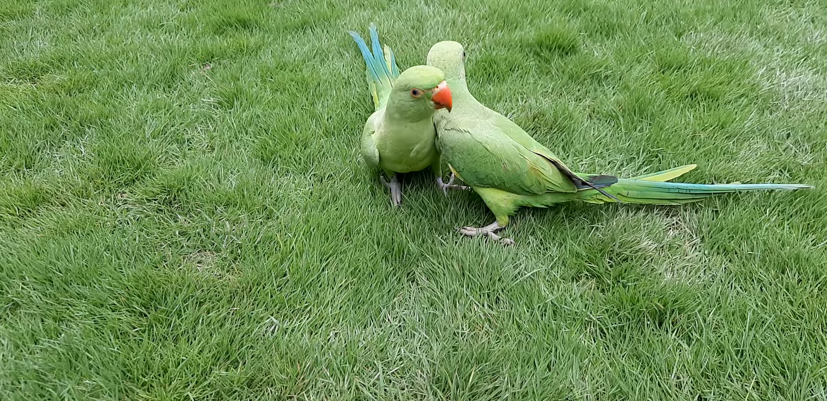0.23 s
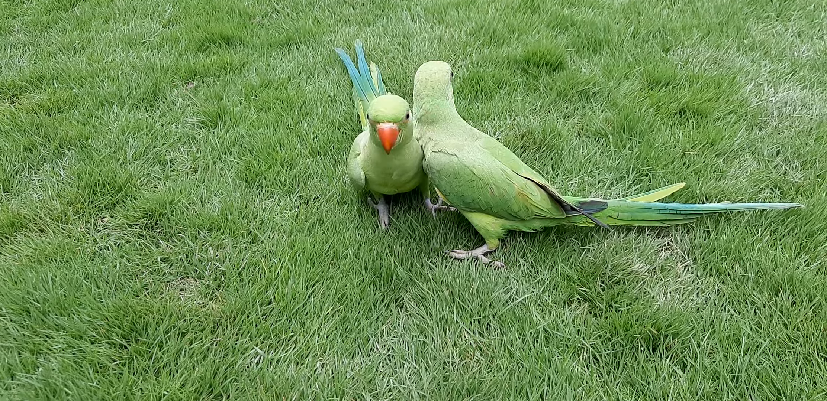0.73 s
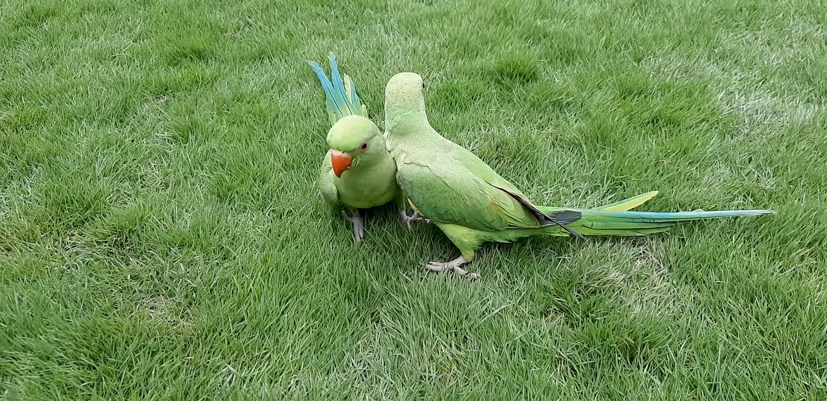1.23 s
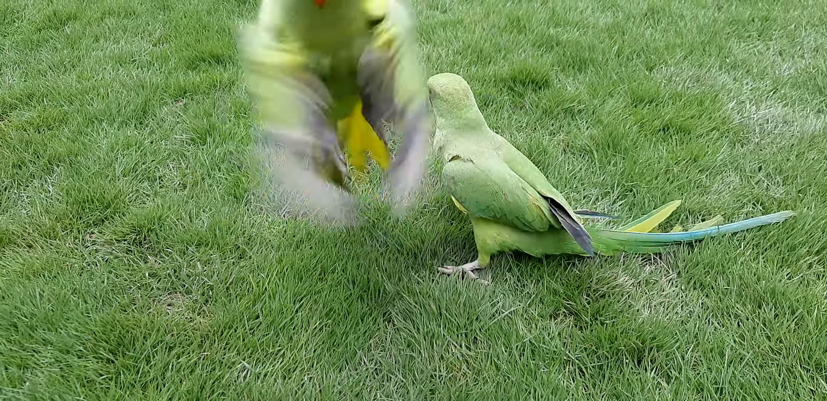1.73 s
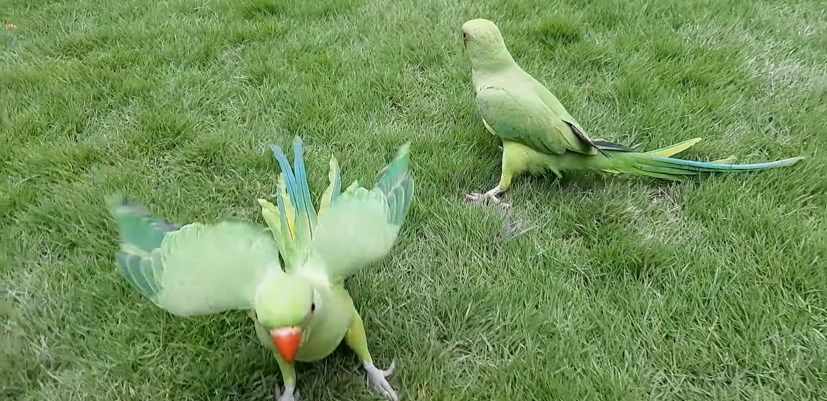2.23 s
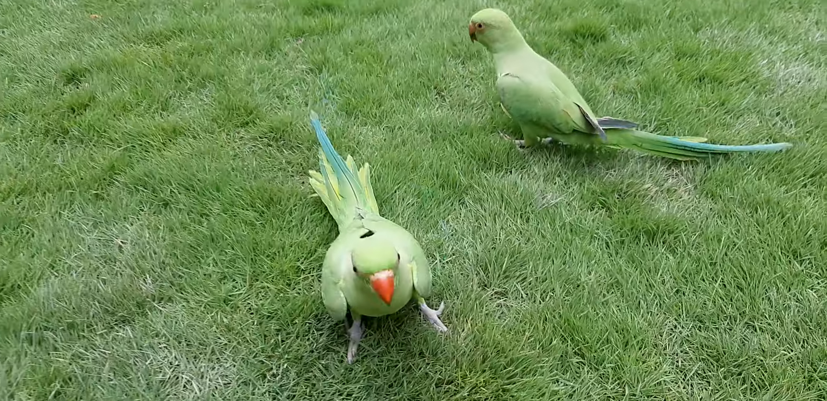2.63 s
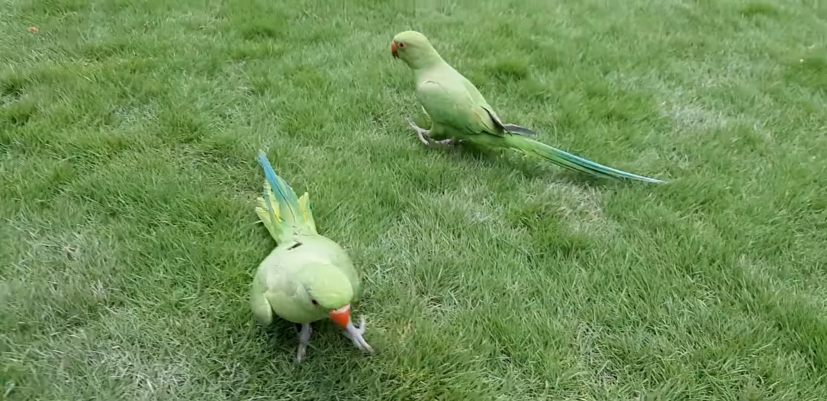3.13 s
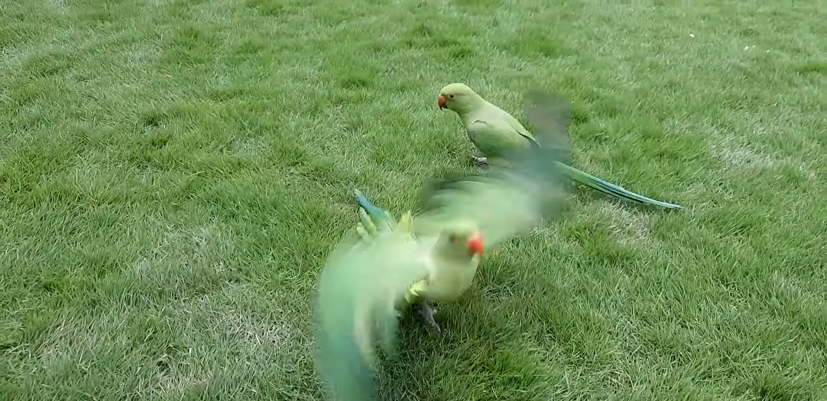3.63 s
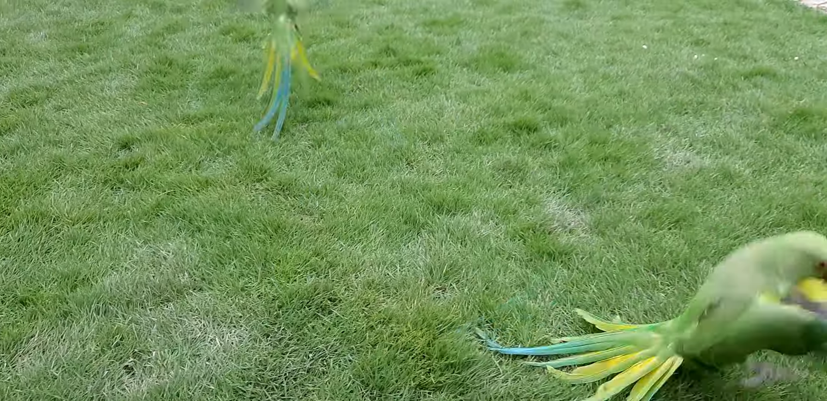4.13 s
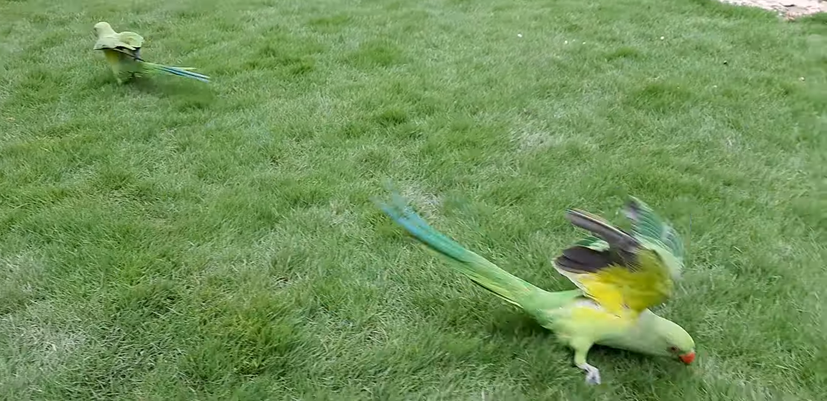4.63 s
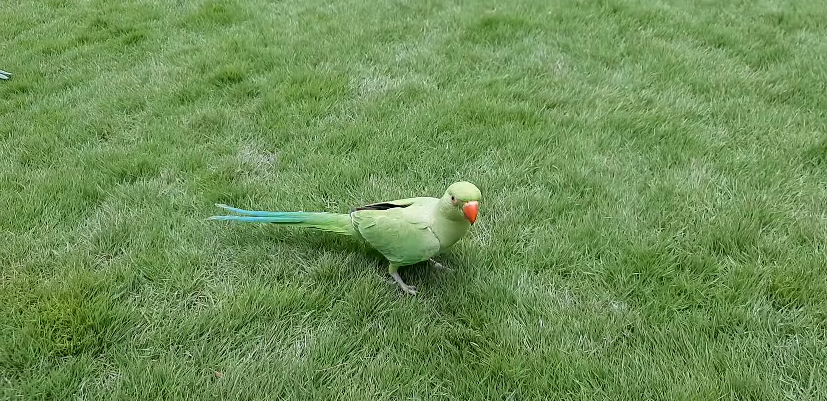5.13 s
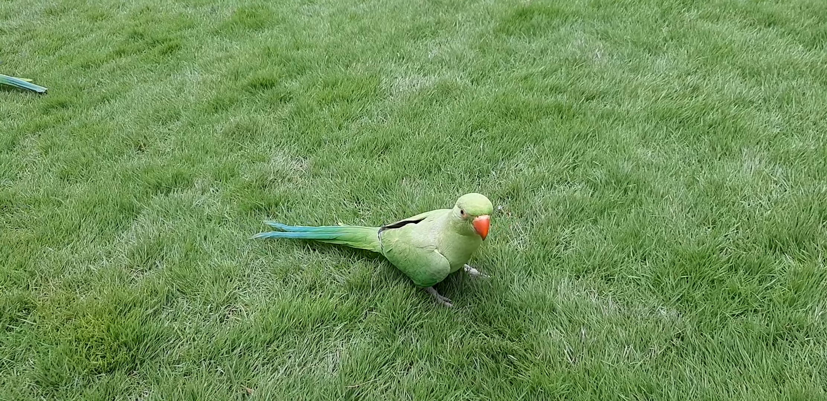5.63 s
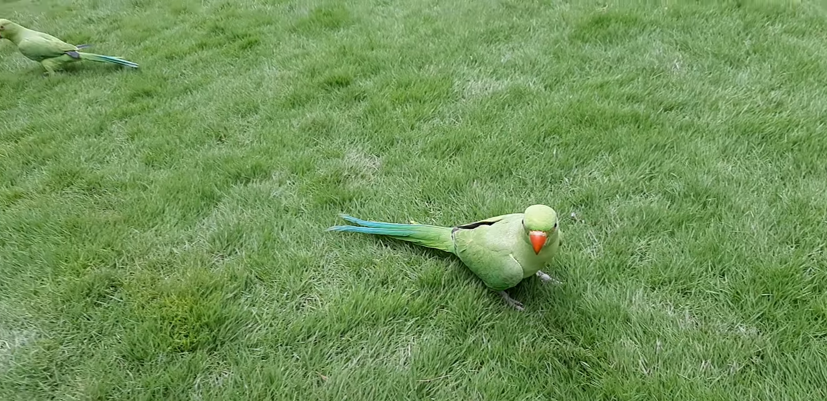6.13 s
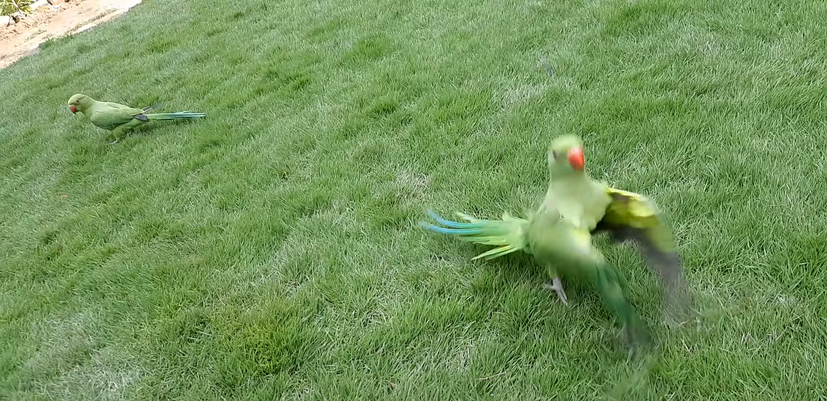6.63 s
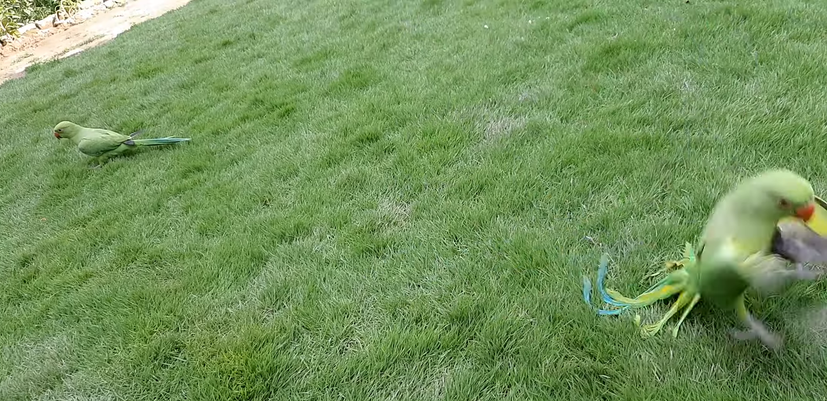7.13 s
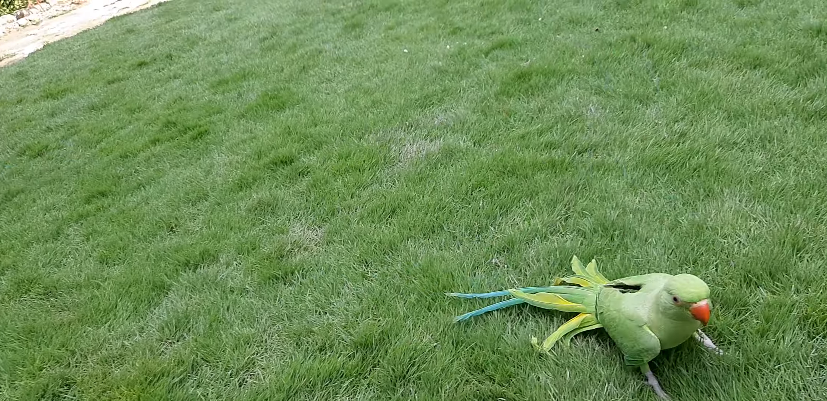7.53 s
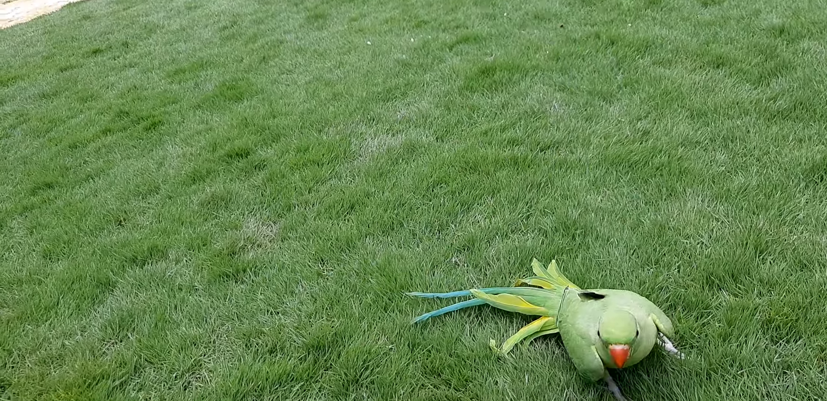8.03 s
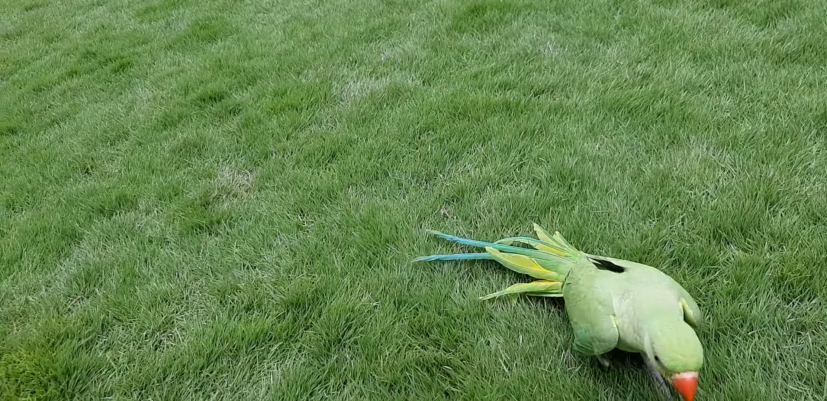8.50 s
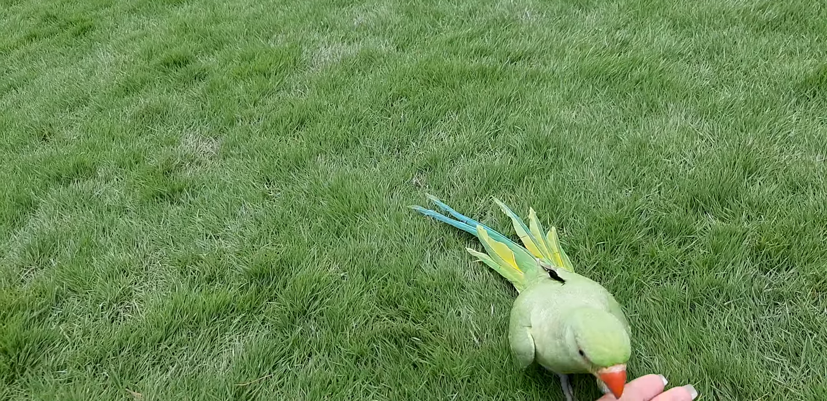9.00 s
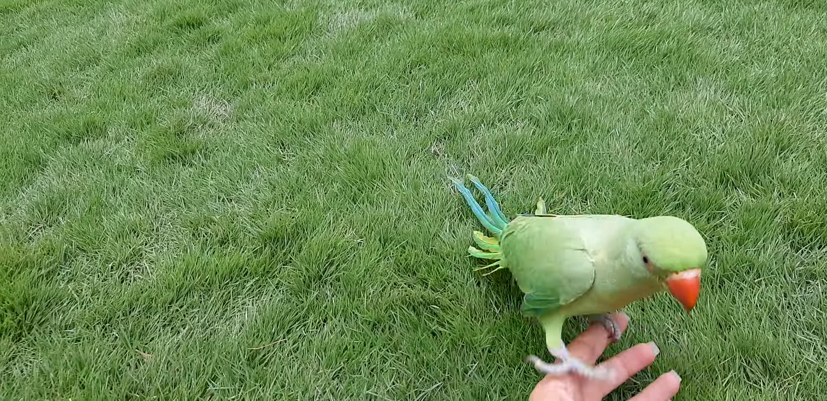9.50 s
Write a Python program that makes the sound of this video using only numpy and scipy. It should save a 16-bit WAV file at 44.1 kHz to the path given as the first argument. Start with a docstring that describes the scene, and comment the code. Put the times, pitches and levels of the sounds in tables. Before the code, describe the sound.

Steady machine hum and airy whir on a lawn, three short bursts of fluttering parakeet wings, and two shrill squawks before the last flight.

```python
"""Parakeets on a lawn beside a humming machine

Two parakeets are close to a handheld stereo microphone, and a machine hums and whirs off to the right.
In three short flights, bursts of noise clap about twelve times a second and filtered noise blows as wind.
Between the last two flights come two shrill calls, built from sine partials and noise: a rasp,
a whistled arch, then a jump up into a rough falling note. Wavering tones and noise make the machine,
and faint whistles sound far away."""
import sys
import numpy as np
from scipy import signal
from scipy.fft import rfft, irfft
from scipy.io import wavfile
from scipy.ndimage import uniform_filter1d

SR = 44100
rng = np.random.default_rng(int(sys.argv[2]) if len(sys.argv) > 2 else 0)


def materialize(psi):
    """Save the field psi as 16-bit PCM at rate SR to the path in sys.argv[1].

    A 1-D psi becomes a single channel; in a 2-D psi each row is a channel.
    """
    bounded = np.clip(np.atleast_2d(psi).T, -1, 1)
    quanta = np.round(bounded * 32767).astype(np.int16)
    wavfile.write(sys.argv[1], SR, quanta)


N = 430416
TIME = np.arange(N) / SR
FREQ = np.fft.rfftfreq(N, 1 / SR)
TOP_HZ = 16000  # highest pitch that is kept


def undb(db):
    """Decibels to gain."""
    return 10 ** (np.asarray(db) / 20)


def unit(x):
    """Scale to rms 1."""
    return x / np.sqrt(np.mean(x ** 2))


def progress(start, end):
    """Runs from 0 to 1 between two times."""
    return np.clip((TIME - start) / (end - start), 0, 1)


def step(u, at, width):
    """A soft step from 0 to 1."""
    return (1 + np.tanh((u - at) / width)) / 2


def curves(table):
    """The columns of a table, joined by straight lines in time."""
    s, *columns = np.transpose(table)
    return [np.interp(TIME, s, c) for c in columns]


def spectrum(table, hz=FREQ, order=1):
    """One column of a table, joined by straight lines on a log-frequency axis."""
    rows = np.transpose(table)
    return np.interp(np.log(hz + 1e-3), np.log(rows[0]), rows[order])


def colour(x, db):
    """Filter by a gain in dB for every frequency."""
    return irfft(rfft(x) * undb(db), N)


def noise():
    """White noise."""
    return rng.standard_normal(N)


def walk(rate):
    """Smooth random wandering with spread 1; a higher rate in Hz wanders faster."""
    return unit(irfft(rfft(noise()) * np.exp(-(FREQ / rate) ** 2), N))


def place(x, pan_db, lag):
    """A source at the two ports: left minus right level in dB, and the left one later by lag samples."""
    left = np.roll(x, int(lag)) * undb(pan_db / 2)
    right = x * undb(-pan_db / 2)
    return np.array([left, right])


def add(out, s, sound):
    """Mix a short stereo sound in at time s."""
    i = int(s * SR)
    out[:, i:i + sound.shape[1]] += sound[:, :N - i]


def blips(table, waver):
    """Short sine notes that swell and fade, with a shared waver in pitch."""
    turns = 2 * np.pi * np.cumsum(1 + waver * walk(52.5)) / SR
    out = 0
    for s, hz, db, half_length in table:
        swell = np.exp(-((TIME - s) / half_length) ** 2)
        out = out + undb(db) * swell * np.sin(hz * turns)
    return out


def snap(table, length, grain_db=4):
    """A burst of uneven slaps, a few milliseconds long, ringing with the given spectrum."""
    size = 2048
    t = TIME[:size]
    length = max(length, .001)  # never shorter than 1 ms
    grain = uniform_filter1d(rng.standard_normal(size), size=9) * 2.16
    slaps = rng.standard_normal(size) * undb(grain_db * grain)
    attack = 1 - np.exp(-t / 0.00044)
    decay = np.exp(-(t / length) ** 2 * 2) + 0.055 * np.exp(-t / length / 2)
    slaps *= attack * decay
    # fold the cepstrum so that the ringing only follows the slaps
    cepstrum = irfft(np.log(undb(spectrum(table, np.fft.rfftfreq(size, 1 / SR)))))
    cepstrum[1:size // 2] *= 2
    cepstrum[size // 2 + 1:] = 0
    sound = irfft(rfft(slaps) * np.exp(rfft(cepstrum)))
    return sound / np.sqrt(np.sum(sound ** 2) / (length * SR)) / 5  # peak near 1


# The flights. Each row: first clap in seconds, time between wingbeats in seconds, left minus right in dB,
# level of the air thump in dB, and a list with the peak of each clap in dB.
FLIGHT_ROWS = [(1.719, 0.078, -9, -19, [-13.5, -9.5, -11, -16, -14.5]),
               (3.812, .08, -8, -19.5, [-10, -8, -5, -10.5, -6, -19]),
               (6.791, .0817, -8.5, -25.5, [-8.5, -14, -10, -5, -14, -19.5])]
# Tone colour of stiff feathers slapping. Each row: pitch in Hz, relative level in dB.
FEATHER_COLOUR = [(300, -19), (1500, -11), (2800, -3), (4200, -1.5), (6000, -1), (7500, 0), (9000, -9),
                  (12000, -8.5), (16000, -14)]
# Tone colour of the air squeezed from between the wings. Each row: pitch in Hz, relative level in dB.
THUMP_COLOUR = [(60, -46), (250, -14), (600, 6), (1200, 2), (2200, -2.5), (5000, -24)]
CLAP_S, THUMP_FOLLOWS = 0.0054, 0.55  # length of a clap; dB of thump per dB of clap
RUSTLE_DB, RUSTLE_LEAD_S, RUSTLE_S = -20.5, .004, .016  # level against the clap, head start, length


def claps():
    """Feathers slap and brush together on each steady beat and squeeze out a thump of air."""
    out = np.zeros((2, N))
    for first, beat, pan_db, air_db, strengths in FLIGHT_ROWS:
        for k, db in enumerate(strengths):
            s = first + k * beat
            effort_db = db - np.mean(strengths)
            clap = place(snap(FEATHER_COLOUR, CLAP_S), pan_db, lag=8)
            rustle = place(snap(FEATHER_COLOUR, RUSTLE_S), pan_db, lag=8.8)
            thump = place(snap(THUMP_COLOUR, CLAP_S), -1.5, lag=3.6)
            add(out, s, clap * undb(db))
            add(out, s - RUSTLE_LEAD_S, rustle * undb(db + RUSTLE_DB))
            add(out, s, thump * undb(air_db + THUMP_FOLLOWS * effort_db))
    return out


# Light brushes and flicks of feathers and grass blades.
# Each row: start in seconds, peak in dB, length in seconds (under 0.001 counts as 0.001).
FLICK_ROWS = [(1.636, -30, 0.036), (2.13, -22.5, .018), (2.827, -21, 0.00087), (3.726, -17.5, 0.018),
              (4.071, -14, .002), (4.146, -12, .0018), (4.225, -7, 0.0014), (4.306, -21.5, .005),
              (4.504, -25, 0.0085), (4.607, -22, 0.0056), (6.702, -19, 0.016), (6.811, -10, 0.002),
              (7.13, -8.5, 0.0019), (7.269, -21, .0085), (7.298, -25.5, .014), (7.561, -15.5, 0.0019),
              (7.6434, -20, .0023), (7.804, -18.5, .0024)]


def flicks():
    """Feathers and grass blades brush lightly: short bursts with the feather colour, stronger at the right."""
    out = np.zeros((2, N))
    for s, db, length in FLICK_ROWS:
        add(out, s, place(snap(FEATHER_COLOUR, length), pan_db=-9, lag=8.2) * undb(db))
    return out


# Thud on landing. Each row: start in seconds, peak in dB.
LANDING_ROWS = [(7.245, -20)]


def landings():
    """A landing thuds: a longer burst with the colour of the air thump."""
    out = np.zeros((2, N))
    for s, db in LANDING_ROWS:
        add(out, s, place(snap(THUMP_COLOUR, length=0.013), -1.5, lag=13.4) * undb(db))
    return out


LUMP_SHARE = .53  # the draught peaks on each upstroke, this share of a beat after the clap


def upstrokes():
    """Swings between -1 and 1 with the wingbeat during each flight."""
    out = 0
    for first, beat, _, _, strengths in FLIGHT_ROWS:
        beats = (TIME - first) / beat
        flying = np.clip(np.minimum(beats + 1, len(strengths) + 1 - beats), 0, 1)
        out = out + np.cos(2 * np.pi * (beats - LUMP_SHARE)) * flying
    return out


# Draughts from the wings; the closer the bird, the deeper.
# Each row: start in seconds, end in seconds, level in dB before the wind trim, extra rumble in dB.
DRAUGHT_ROWS = [(1.6, 2.178, -38.5, 4), (3.653, 4.384, -42, -0.5), (6.65, 7.337, -41.5, 0.5),
                (7.29, 7.963, -52, -10)]
# Tone colour of a draught. Each row: pitch in Hz, relative level in dB.
DRAUGHT_COLOUR = [(20, -23), (45, -11), (85, -3.5), (170, -5.5), (330, -9), (700, -13), (1500, -23),
                  (5000, -31)]
# Soft low puffs and bumps. Each row: middle in seconds, pitch in Hz, level in dB, half length in seconds.
PUFF_ROWS = [(1.942, 202, -43, .012), (1.974, 327, -40, 0.0049), (4.015, 353, -35.5, 0.0042),
             (4.095, 260, -32.5, 0.0061), (4.169, 317, -38.5, .012), (4.335, 256, -43, 0.0091),
             (5.166, 338, -49.5, .04), (7.589, 305, -40, 0.0053), (8.37, 368, -43, 0.023),
             (9.58, 259, -54, 0.011)]
DRAUGHT_ROUND = 0.5  # 0 = abrupt, 1 = a gentle arch
RUMBLE_HZ, WIND_DB, LUMP_DB = 130, -2, 1.5  # top of the rumble; trim; swing with the upstrokes
APART = 0.22  # how much the wind differs between the ports


def downwash():
    """Air stirred by the wings rumbles over the microphone as swelling noise, with a few soft puffs."""
    middle, side = [unit(colour(noise(), spectrum(DRAUGHT_COLOUR))) for _ in range(2)]
    air = middle + APART * side * np.array([[1], [-1]])
    air = air * undb(1.2 * walk(25) + LUMP_DB * upstrokes() + WIND_DB)
    rumble = colour(air, -20 * np.log10(1 + (FREQ / RUMBLE_HZ) ** 4))
    out = blips(PUFF_ROWS, waver=0.0393)
    for start, end, db, rumble_db in DRAUGHT_ROWS:
        swell = np.abs(np.sin(np.pi * progress(start, end))) ** DRAUGHT_ROUND
        out = out + (air - rumble + rumble * undb(rumble_db)) * swell * undb(db)
    return out


# How the throat and open beak shape the voice. Each row: pitch in Hz, relative level in dB.
THROAT_COLOUR = [(900, -45), (1600, -22), (1950, -4), (2700, -2), (3400, 0), (4200, 0), (4600, 6),
                 (5100, 7), (5900, -7), (6800, -3), (8000, -10), (10200, -4), (11300, -14), (12200, -7),
                 (13600, -22), (16000, -32)]
# Tone colour of the harsh, noisy part of the voice. Each row: pitch in Hz, relative level in dB.
RASP_COLOUR = [(800, -34), (1700, -19), (2500, -2), (3900, 0), (5200, -2), (6500, -8), (8200, -17),
               (10000, -12), (12800, -15), (14000, -34)]
SLOPE_DB, SPLIT_DULL_DB = -12.5, -14  # how upper partials weaken: always, and as the cycles alternate
HALF_LINE_GAIN = 2.6  # strength of the half lines when the cycles alternate fully
JITTER, WAVER, SHIMMER_DB, HISS = .04, .003, 3, .03  # pitch shake with rasp, without; level shake; least noise


def call(hz, db, split, rasp, on):
    """The syrinx whistles through the throat; alternating cycles add half lines, and chaos turns it to a rasp."""
    split, rasp = np.clip(split[on], 0, 1), np.clip(rasp, 0, 1)
    hz = (hz * (1 + (WAVER + JITTER * rasp) * walk(700)))[on]
    phase = 2 * np.pi * np.cumsum(hz) / SR
    tones, power = 0, 0
    for k in np.arange(1, 9) / 2:
        # as the cycles alternate, the membranes close more softly and the upper partials fade
        source_db = SLOPE_DB * np.sqrt(max(k - 1, 0)) + SPLIT_DULL_DB * np.sqrt(split * max(k - 3 / 2, 0))
        size = undb(source_db + spectrum(THROAT_COLOUR, k * hz)) * (k * hz < TOP_HZ)
        if k % 1:  # a half line, between the whole multiples of the pitch
            size = size * split * HALF_LINE_GAIN
        tones = tones + size * np.sin(k * phase)
        power = power + size ** 2 / 2
    voice = np.zeros(N)
    voice[on] = tones / np.sqrt(power)
    voice *= undb(SHIMMER_DB * np.sqrt(rasp) * walk(500))
    # a little rasp only shakes the tone; more breaks it up into quick irregular bursts
    chaos = unit(colour(noise() * undb(3 * walk(400)), spectrum(RASP_COLOUR)))
    broken = HISS + (1 - HISS) * rasp ** (3 / 2)
    return (np.sqrt(1 - broken ** 2) * voice + broken * chaos) * undb(db) * on


CHIRP_FROM, CHIRP_LOW_HZ, CHIRP_HIGH_HZ = .63, 2900, 4900  # share of the opening where it starts; pitch range
CHIRP_DB, CHIRP_RASP = 9, .38  # lift, and rasp left over


def opening(u, db):
    """A rasp that tightens into a quick upward chirp: pitch, level, alternation, rasp."""
    rise = np.clip((u - CHIRP_FROM) / (1 - CHIRP_FROM), 0, 1)
    push = np.sin(np.pi * rise)
    pitch = CHIRP_LOW_HZ + (CHIRP_HIGH_HZ - CHIRP_LOW_HZ) * rise
    rasp = 1 + (CHIRP_RASP - 1) * step(u, CHIRP_FROM, width=0.098)
    return [pitch, db + CHIRP_DB * (push - rise), SPLIT_EARLY * (1 - rise), rasp]


ARCH_PEAK, ARCH_POWER = .2, 1.7  # share of the whistle where it is highest; bend of the sag
ARCH_RISE_HZ, ARCH_END_HZ, FADE_DB_PER_HZ = 120, 2660, .024
WHISTLE_RASP, FRAYED_RASP = .015, .3  # rasp at first, and rasp added by the end


def arch(u, top_hz, db):
    """A clear whistle that rises a little, then sags, fading and fraying: pitch, level, alternation, rasp."""
    climb = np.maximum(1 - u / ARCH_PEAK, 0) ** 2
    sag = np.maximum((u - ARCH_PEAK) / (1 - ARCH_PEAK), 0) ** ARCH_POWER
    drop_hz = ARCH_RISE_HZ * climb + (top_hz - ARCH_END_HZ) * sag
    return [top_hz - drop_hz, db - FADE_DB_PER_HZ * drop_hz, 0 * u, WHISTLE_RASP + FRAYED_RASP * sag ** 2]


# shares of the falling note where the cycles start to alternate and where the voice breaks and drops
FALL_END_HZ, SPLIT_AT, BREAK_AT, BREAK_DB = 2520, 0.54, 0.73, -11.5
FALL_SWELL_DB, FALL_FADE_DB = 4.5, -3  # it grows towards the break and dies away after it
SPLIT_EARLY, SPLIT_LATE, FALL_RASP, BROKEN_RASP = .17, .9, .12, .5


def fall(u, from_hz, db, bend):
    """A falling note that swells, starts to alternate, then breaks: pitch, level, alternation, rasp."""
    split, broken = step(u, SPLIT_AT, width=0.14), step(u, BREAK_AT, width=0.03)
    pitch = from_hz + (FALL_END_HZ - from_hz) * u ** bend
    swell_db = FALL_SWELL_DB * (np.minimum(u / BREAK_AT, 1) - 1 / 2)
    fade_db = FALL_FADE_DB * np.maximum((u - BREAK_AT) / (1 - BREAK_AT), 0) ** 2
    alternation = SPLIT_EARLY + (SPLIT_LATE - SPLIT_EARLY) * split
    rasp = FALL_RASP + (BROKEN_RASP - FALL_RASP) * (split + broken) / 2
    return [pitch, db + swell_db + BREAK_DB * broken + fade_db, alternation, rasp]


# The calls. Each row: start, whistle start, jump and end, all in seconds, rasp level in dB,
# highest whistle pitch in Hz, whistle level in dB, pitch after the jump in Hz, falling note level in dB,
# bend of the fall (1 = straight).
SQUAWK_ROWS = [(5.373, 5.389, 5.4475, 5.496, -18.5, 3410, -7, 4240, -17, 1.2),
               (5.604, 5.626, 5.6485, 5.726, -24.5, 3100, -24, 4060, -20, 1.0)]
CALL_EDGE_S, GLIDE_S = 0.003, 0.00177  # fade at both ends; time to change register


def squawk(start, whistle, jump, end, rasp_db, top_hz, whistle_db, fall_hz, fall_db, bend):
    """One call: the voice passes through its three registers without a gap."""
    first = opening(progress(start, whistle), rasp_db)
    second = arch(progress(whistle, jump), top_hz, whistle_db)
    third = fall(progress(jump, end), fall_hz, fall_db, bend)
    controls = np.where(TIME < whistle, first, np.where(TIME < jump, second, third))
    controls = uniform_filter1d(controls, size=max(int(GLIDE_S * SR), 1))
    edges = progress(start, start + CALL_EDGE_S) * progress(end, end - CALL_EDGE_S)
    return call(*controls, edges > 0) * edges


def garden(x, echo_db, t60):
    """Weak scattered echoes from the ground and walls: fading noise tails, different at each port."""
    t = TIME[:SR // 2]
    tails = rng.standard_normal((2, len(t))) * undb(-60 * t / t60) * (t > .004)
    tails /= np.sqrt(np.sum(tails ** 2, axis=1, keepdims=True))
    return undb(echo_db) * signal.fftconvolve(x.mean(axis=0)[None], tails, axes=1)[:, :N]


def tone(hz, db, pan_db, late, waver_hz, flutter_db):
    """A sine that wavers a little in pitch and level; the left port trails by `late` radians."""
    phase = 2 * np.pi * np.cumsum(hz + waver_hz * walk(6.7)) / SR
    ports = np.array([np.sin(phase - late) * undb(pan_db / 2), np.sin(phase) * undb(-pan_db / 2)])
    return np.sqrt(2) * ports * undb(db + flutter_db * walk(4.4))


# Blade tone; direct and reflected sound mix differently as the microphone moves.
# Each row: time in seconds, level in dB, left minus right in dB, lateness of the left port in radians.
BLADE_ROWS = [(0, -47.5, -7, .8), (2.2, -48, -12.5, 0.9), (2.55, -47.5, 7, 3.4), (3.1, -42, 2.5, 3.4),
              (3.6, -43, 0, 1.95), (5.2, -41, -0.5, 2.08), (7.5, -45.5, 1.5, 1.6), (8.3, -44.5, 2, 2.56),
              (9.76, -44, 4.5, 2.63)]
BLADE_EARLY_HZ, BLADE_LATE_HZ, BLADE_CREEP_HZ_PER_S = 851.5, 848, 2.0
SLOW_START_S, SLOW_END_S = 3.05, 3.6  # the blades creep up in speed, then settle between these times


def blade_tone():
    """The turning blades give a strong steady tone that creeps up, then settles lower."""
    slowed = progress(SLOW_START_S, SLOW_END_S)
    creeping_hz = BLADE_EARLY_HZ + BLADE_CREEP_HZ_PER_S * TIME
    hz = creeping_hz * (1 - slowed) + BLADE_LATE_HZ * slowed
    return tone(hz, *curves(BLADE_ROWS), waver_hz=0.87, flutter_db=0.26)


# Swells of the lower drone.
# Each row: middle in seconds, half length in seconds, level in dB before the drone trim.
SWELL_ROWS = [(0.167, 0.67, -57.5), (1.55, 0.47, -52.5), (3.55, 0.49, -62), (5.28, 0.57, -50.5),
              (6.278, 0.21, -56.5), (8.584, 0.52, -53.5), (9.646, 0.21, -58)]
DRONE_HZ, DRONE_REST_DB, DRONE_DB = 406.2, -69.5, -1  # pitch; level between swells before the trim; trim


def drone():
    """A swelling sine tone about an octave below the blade tone."""
    swell = undb(DRONE_REST_DB)
    for s, half_length, db in SWELL_ROWS:
        swell = swell + undb(db) * np.exp(-((TIME - s) / half_length) ** 2)
    return swell * tone(DRONE_HZ, DRONE_DB, pan_db=1, late=.35, waver_hz=1.14, flutter_db=1.7)


# Weaker machine tones. Each row: pitch in Hz, early level in dB, late level in dB
# (tones above 1000 Hz also get the lift near the end).
TONE_ROWS = [(80.5, -63, -78), (564, -65, -64), (629, -59, -69), (671, -67, -62), (794, -63, -59),
             (1446, -69, -65), (1772, -62, -73), (2316, -63, -61), (2620, -67, -63)]
EASE_START_S, EASE_END_S = 3.7, 4.7  # the machine's load changes between these times
UPPER_FROM_S, UPPER_FULL_S, UPPER_DB = 8.3, 8.45, 4  # the tones above 1 kHz grow stronger near the end
WHINE_HZ, WHINE_RISE_HZ_PER_S, WHINE_EARLY_DB, WHINE_LATE_DB = 729, 7.5, -50.5, -58.5


def load_tones():
    """A whine climbs under load, then drops back and softens; weaker tones change level with the load."""
    eased = progress(EASE_START_S, EASE_END_S)
    whine_hz = WHINE_HZ + WHINE_RISE_HZ_PER_S * TIME * (1 - eased)
    whine_db = WHINE_EARLY_DB + (WHINE_LATE_DB - WHINE_EARLY_DB) * eased
    out = tone(whine_hz, whine_db, pan_db=-2.5, late=1.33, waver_hz=1.2, flutter_db=1.2)
    upper_db = UPPER_DB * progress(UPPER_FROM_S, UPPER_FULL_S)
    for hz, early_db, late_db in TONE_ROWS:
        db = early_db + (late_db - early_db) * eased + upper_db * (hz > 1000)
        late = 2 * np.pi * hz * .00032  # the left port hears it 0.32 ms later
        out = out + tone(hz, db, pan_db=-2.5, late=late, waver_hz=.002 * hz, flutter_db=2)
    return out


# The machine's rush of air. Each row: pitch in Hz, level in dB per Hz before the casing and later trims.
WHIR_COLOUR = [(25, -106), (60, -95), (135, -78.5), (220, -81), (600, -78), (690, -67), (860, -68.5),
               (960, -77), (1350, -83.5), (2100, -75.5), (4400, -80.5), (6800, -85), (8300, -98),
               (12500, -95.5), (16000, -99)]
# Resonances of its casing. Each row: pitch in Hz, width in Hz, lift in dB.
CASING_ROWS = [(1440, 12.8, 14), (1646, 10.4, 10.5), (1953, 17, 8.5), (2321, 36, 9.5), (2601, 60, 7.5),
               (2950, 82, -6), (3078, 28, 9.5), (3240, 150, 6), (4030, 106, 7), (5120, 270, 3.5),
               (5860, 160, -3)]
# How the machine reaches the two ports.
# Each row: pitch in Hz, likeness of the ports from 0 to 1, left minus right in dB.
PORT_ROWS = [(60, .97, 2), (170, 1, -1), (406, 1, 0), (940, 0.95, -2.5), (1580, 0.36, -2),
             (2530, 0.37, -4.5), (4430, 0, -7), (8450, 0.32, -10.5), (14700, 0, -4.5)]
# Level of the whir as the microphone moves; only the changes around each average are used.
# Each row: time in seconds, body in dB, treble in dB.
SHIFT_ROWS = [(0.4, -50.5, -42.5), (1.98, -50, -41.5), (2.37, -49.5, -43), (4.05, -48.5, -42),
              (4.93, -51, -41), (7.21, -52, -42), (8.01, -54, -44), (9.0, -51, -40), (9.7, -51.5, -41)]
BODY_DB, FLICKER_DB = -2, .3  # the body against the treble; flicker of the treble
MACHINE_LAG = 20  # samples by which the left port hears it later


def whir():
    """The machine's air noise through its casing; the treble arrives more scattered than the bass."""
    shape = spectrum(WHIR_COLOUR)
    for hz, width, db in CASING_ROWS:
        shape = shape + db * np.exp(-2 * ((FREQ - hz) / width) ** 2)
    alike = np.clip(spectrum(PORT_ROWS), 0, 1)
    direct = place(colour(noise(), shape + 10 * np.log10(alike + 1e-6)), 0, MACHINE_LAG)
    scattered = colour(np.array([noise(), noise()]), shape + 10 * np.log10(1 - alike + 1e-6))
    sides = np.array([[1], [-1]]) / 2
    both = colour(direct + scattered, spectrum(PORT_ROWS, order=2) * sides) * np.sqrt(SR / 2)
    body = colour(both, -20 * np.log10(1 + (FREQ / 1150) ** 6))
    treble = both - body
    body_db, treble_db = (db - db.mean() for db in curves(SHIFT_ROWS))
    return body * undb(body_db + BODY_DB) + treble * undb(treble_db + FLICKER_DB * walk(18))


# Faint distant whistles.
# Each row: middle in seconds, pitch in Hz, level in dB before panning, half length in seconds.
WHISTLE_ROWS = [(2.82, 3150, -50, 0.14), (3.21, 5110, -50.5, 0.18), (3.22, 8726, -66, .12)]


def distant_whistles():
    """Faint wavering sine notes that swell and fade, mostly at the right."""
    return place(blips(WHISTLE_ROWS, waver=0.0016), pan_db=-15, lag=0)


def scene():
    """Wings and calls on the lawn with their echoes, the machine and faint whistles behind them."""
    wings = claps() + flicks() + landings()
    wing_echo = garden(wings, echo_db=-9.5, t60=0.34)
    calls = place(sum(squawk(*row) for row in SQUAWK_ROWS), pan_db=-1.2, lag=-13)
    call_echo = garden(calls, echo_db=-17, t60=.2)
    birds = wings + wing_echo + downwash() + calls + call_echo
    machine = blade_tone() + drone() + load_tones() + whir()
    return birds + machine + distant_whistles()


START_S = .069  # silence before this time


def record(dry):
    """The recorder starts a moment late and cuts the top."""
    running = progress(START_S, START_S + .002)
    top_cut = signal.ellip(8, .2, 70, TOP_HZ, fs=SR, output="sos")
    return signal.sosfilt(top_cut, dry * running)


dry = scene()
out = record(dry)
materialize(out)
```